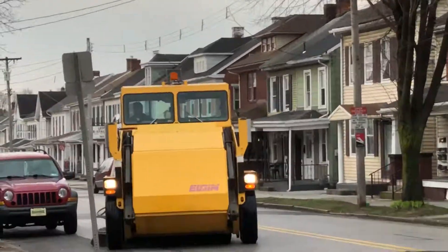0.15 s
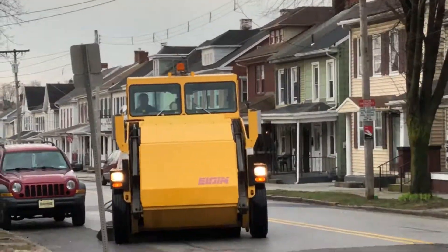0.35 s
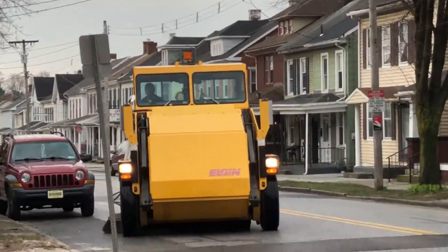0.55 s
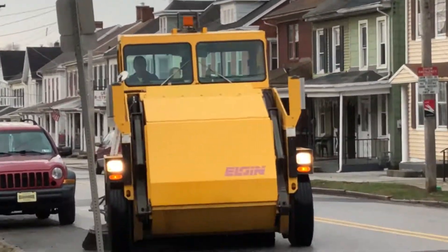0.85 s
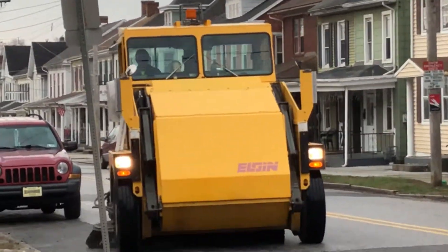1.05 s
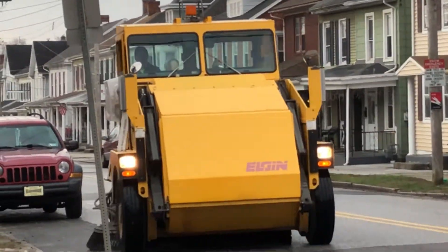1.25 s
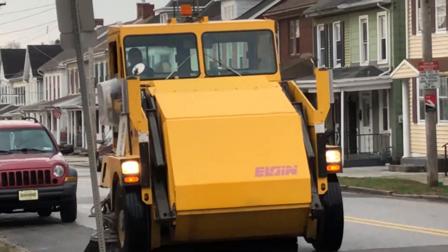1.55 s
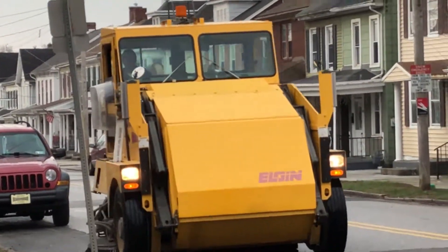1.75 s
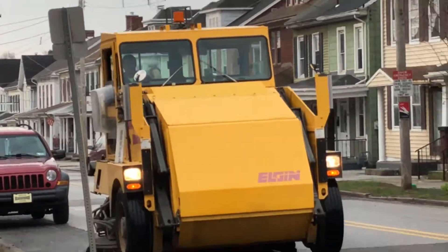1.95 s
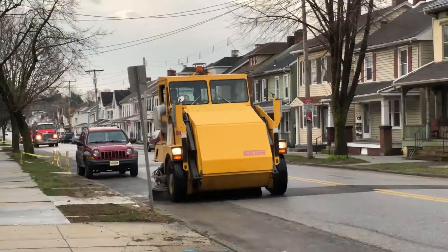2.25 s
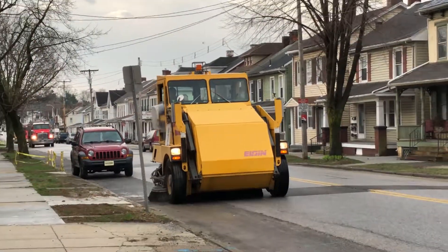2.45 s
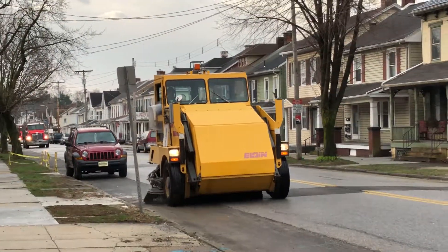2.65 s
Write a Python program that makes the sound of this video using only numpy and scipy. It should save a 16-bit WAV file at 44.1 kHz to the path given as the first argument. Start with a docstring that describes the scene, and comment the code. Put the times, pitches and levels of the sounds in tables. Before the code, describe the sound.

Street sweeper roaring steadily, low throbbing drone with bristle hiss in swells and two dull knocks

```python
"""The engine of a street sweeper, held at high revs, creeps closer along a wet residential street.
Harmonics of its uneven four-cylinder cycle drone and throb over pulsed noise: rumble and clatter.
A second, slower drive beats against it. Band-filtered noise and impulses make the bristles hiss on
the road in swells. A harmonic whine sinks and fades early; damped modes make the body knock twice."""
import sys
import numpy as np
from scipy import signal
from scipy.fft import rfft, irfft
from scipy.io import wavfile

SR = 44100
rng = np.random.default_rng(int(sys.argv[2]) if len(sys.argv) > 2 else 0)


def generate_wav(sig):
    """Save sig (samples, or channels by samples) to the path in sys.argv[1] as 16-bit PCM at SR."""
    pcm = np.round(np.clip(np.atleast_2d(sig).T, -1, 1) * 32767).astype(np.int16)
    wavfile.write(sys.argv[1], SR, pcm)


N = 123480
T = np.arange(N) / SR

# Mean firing rate of the engine: [t/s, f/Hz]
FIRING_RATE = [(0, 110.9), (.35, 110.5), (.85, 112.6), (1.7, 112.9), (2.8, 113.8)]
# Tone at the firing rate: [t/s, level/dB]
DRONE = [(0.0, -36), (0.02, -33.5), (0.65, -25), (0.79, -29.5), (1.27, -26), (1.36, -28.5), (1.84, -31.5),
         (1.89, -26.5), (2.76, -29.5), (2.8, -36)]
# Throb at the crank rate, before THROB_TRIM_DB: [t/s, level/dB]
THROB = [(0.0, -39), (0.36, -33.5), (1.01, -31.5), (1.67, -38), (2.43, -40), (2.46, -36), (2.8, -44)]
# Overtones of the firing: [t/s, level/dB at 1.5 times its rate, level/dB at twice its rate]
GROWL = [(0, -43, -46), (.55, -37.5, -47), (.9, -56, -42), (1.2, -57, -51), (1.42, -39, -38),
         (1.7, -40, -42.5), (1.92, -59, -41), (2.1, -46, -38), (2.45, -35.5, -34), (2.62, -31, -42),
         (2.8, -43, -48)]
# Weaker exhaust partials: [multiple of the cycle rate, level/dB far (start), level/dB near (end)]
EXHAUST_PARTIALS = [(9, -40, -53), (10, -58, -52), (12, -45, -45.5), (18, -55, -58), (22, -56.5, -53),
                    (24, -59, -53), (36, -65, -56)]
# Clear engine note, strongest early on: [t/s, level/dB]; and its multiple of the cycle rate
NOTE = [(0, -57), (.15, -47), (.4, -45.5), (.55, -54), (.7, -58), (2.8, -57)]
NOTE_ORDER = 20
# Clatter spectrum: [f/Hz, relative level/dB per Hz]
CLATTER_COLOUR = [(150, 2), (280, 6), (370, 2.5), (450, -1.5), (640, 0), (880, -3), (1130, 2.5), (1550, -2),
                  (2000, -.5), (2500, -3.5), (3100, -12), (5000, -18.5), (12000, -34)]
# Clatter: [t/s, level/dB]
CLATTER_LEVEL = [(0, -35), (.65, -35), (1.0, -36), (1.35, -34), (2.2, -35), (2.8, -34)]
# Slower drive: [t/s, f/Hz, level/dB of its fundamental]
DRIVE = [(0, 69.5, -52), (1.2, 71, -42), (1.45, 69.97, -44), (2.2, 70.6, -41), (2.55, 70.54, -35),
         (2.8, 71, -41)]
# Rumble: [t/s, level/dB]
RUMBLE_LEVEL = [(0, -33), (.04, -29), (.16, -34.5), (.3, -37), (.5, -39), (1.0, -38), (1.5, -37.5),
                (2.1, -38), (2.3, -35.5), (2.42, -29.5), (2.62, -34), (2.8, -33.5)]
# Rumble spectrum: [f/Hz, relative level/dB per Hz]
RUMBLE_COLOUR = [(20, -17), (35, -2), (50, -9), (70, 0), (95, -1), (140, 0.5), (195, -3.5), (260, -5.5),
                 (340, -11), (450, -21), (900, -59)]
# Hollow early hum: [t/s, level/dB]; its centre f/Hz; the rate of its wavering, f/Hz
HUM_LEVEL = [(0, -56), (.08, -32), (.2, -43), (.36, -35), (.46, -49), (.8, -60)]
HUM_HZ = 328
HUM_WIDTH_HZ = 22
# Bristle hiss before the band trims:
# [t/s, level/dB of middle band, level/dB of lower re middle, level/dB of top re middle]
BRUSH = [(0.0, -31, -7, -5), (0.12, -30.5, -9.5, -8), (0.37, -35, -5.5, 2), (0.61, -30, -5.5, -5.5),
         (1.2, -32, -5.5, 0), (1.45, -32.5, -3, 1.5), (1.68, -28, -4, 0), (1.79, -34, -1.5, 0),
         (2.0, -24, -2.5, 0), (2.05, -28, -0.5, -1), (2.29, -28, -4, 1), (2.39, -34, -3, 1),
         (2.6, -29, -6.5, -2.5), (2.7, -31, -3, 1), (2.8, -29, -5.5, -0.5)]
# Spectra of the three hiss bands: [f/Hz, relative level/dB per Hz]
HISS_LOW = [(2000, -19), (3100, -12), (3800, -5.5), (4400, -5.5), (5000, -2), (6200, -0.5), (7200, -2.5),
            (9000, -26)]
HISS_MID = [(4500, -18), (6300, -10.5), (7400, 0.5), (8600, 1), (9600, 1), (10600, -7), (12500, -32)]
HISS_TOP = [(8500, -44), (10200, -0.5), (11000, 0.5), (11900, 1.5), (13000, -2), (14200, -4), (15600, -11)]
# Band trims: [lower level/dB, middle level/dB, top level/dB]
HISS_TRIMS = (0.5, .5, 0.5)
# Whine: [t/s, f/Hz of the absent fundamental, level/dB]
WHINE = [(0, 182.5, -39.5), (.22, 181.5, -39), (.42, 177, -43.5), (.6, 174.5, -44.5), (.9, 168.5, -48),
         (1.1, 166, -65)]
# Whine harmonics: [multiple of the fundamental, level/dB re the whine level]
WHINE_PARTIALS = [(2, -7), (3, -15), (4, -6), (5, -14.5), (6, -4)]
# Knocks of the body: [onset t/s, peak level/dB]
KNOCKS = [(1.883, -24), (2.170, -15.5)]
# Modes of the body: [f/Hz, relative level/dB, 60 dB decay t/s]
BODY_MODES = [(208, -4, .035), (296, 3, 0.023), (410, -1, 0.024)]

SPEED_JITTER = 0.003  # rms fraction of the firing rate
THROB_TRIM_DB, DRIVE_OCTAVE_DB = -0.5, -2.5
EXHAUST_FLUTTER = 0.36  # rms, relative to the steady partial
RUMBLE_PULSING, CLATTER_PULSING = 0.59, 0.16  # modulation depths, 0 to 1
FLICKS_PER_S, FLICK_SPREAD_DB, FLICK_DB = 5000, 3, -6.5
KNOCK_PUSH_S = 0.0012  # time constant of the onset
TOP_HZ = 15700


def undb(db):
    """A level in decibels is 20 log10 of the amplitude ratio returned here."""
    return 10 ** (np.asarray(db) / 20)


def unit(x):
    """Division by the root mean square gives a signal of rms 1."""
    return x / np.sqrt(np.mean(x ** 2))


def curve(table, axis=1):
    """Linear interpolation in time joins the values of one table column."""
    rows = np.array(table, float)
    return np.interp(T, rows[:, 0], rows[:, axis])


def colour(x, points):
    """Spectral shaping: multiply the spectrum by a gain curve, then scale to rms 1."""
    hz, db = np.array(points, float).T
    f = np.maximum(np.fft.rfftfreq(N, 1 / SR), 1)
    gain = undb(np.interp(np.log(f), np.log(hz), db))
    # beyond the end points the gain falls by 12 dB per octave
    outside = np.maximum(np.maximum(np.log(hz[0] / f), np.log(f / hz[-1])), 0)
    return unit(irfft(rfft(x) * gain * np.exp(-2 * outside), N))


def noise():
    """White noise: independent Gaussian samples have equal expected power at all frequencies."""
    return rng.standard_normal(N)


def walk(rate):
    """Low-passed noise fluctuates smoothly at about the given rate in Hz, with rms 1."""
    f = np.fft.rfftfreq(N, 1 / SR)
    lowpass = (f > 0) / (1 + (f / rate) ** 2) ** 2
    return unit(irfft(rfft(noise()) * lowpass, N))


def partial(turns, order, flutter, rate):
    """A harmonic of a rotation; complex modulation makes its amplitude and phase waver."""
    waver = 1 + flutter * (walk(rate) + 1j * walk(rate))
    phase = 2 * np.pi * (order * turns + rng.random())
    return unit(np.real(waver * np.exp(1j * phase)))


def clatter(firings):
    """Amplitude modulation: broadband noise pulses at the firing rate."""
    gate = 1 + CLATTER_PULSING * np.cos(2 * np.pi * firings)
    return undb(curve(CLATTER_LEVEL)) * colour(gate * noise(), CLATTER_COLOUR)


def engine(firings):
    """Harmonic synthesis: uneven cylinders excite multiples of the four-firing cycle."""
    cycle = firings / 4
    drone = undb(curve(DRONE)) * partial(cycle, order=4, flutter=0.064, rate=23)
    throb = undb(curve(THROB) + THROB_TRIM_DB) * partial(cycle, order=2, flutter=0.15, rate=16)
    growl = undb(curve(GROWL)) * partial(cycle, order=6, flutter=0.14, rate=3.7)
    growl += undb(curve(GROWL, axis=2)) * partial(cycle, order=8, flutter=0.29, rate=6.5)
    upper = np.zeros(N)
    for order, far, near in EXHAUST_PARTIALS:
        level = far + (near - far) * T / T[-1]
        upper += undb(level) * partial(cycle, order, EXHAUST_FLUTTER, rate=8)
    note = undb(curve(NOTE)) * partial(cycle, NOTE_ORDER, flutter=0.13, rate=8)
    return drone + throb + growl + upper + note + clatter(firings)


def drive():
    """Beating: a slower rotation sounds a low tone and its octave against the engine."""
    turns = np.cumsum(curve(DRIVE)) / SR
    tone = partial(turns, order=1, flutter=0.25, rate=6.4)
    octave = partial(turns, order=2, flutter=0.47, rate=8)
    return undb(curve(DRIVE, axis=2)) * (tone + undb(DRIVE_OCTAVE_DB) * octave)


def hum():
    """Narrow-band resonance: random modulation broadens a fixed tone into a hollow early hum."""
    return undb(curve(HUM_LEVEL)) * partial(HUM_HZ * T, order=1, flutter=0.9, rate=HUM_WIDTH_HZ)


def rumble(firings):
    """Amplitude modulation: low exhaust noise puffs once a crank turn, every two firings."""
    puffs = (1 + RUMBLE_PULSING * np.cos(np.pi * firings)) * noise()
    return undb(curve(RUMBLE_LEVEL)) * colour(puffs, RUMBLE_COLOUR)


def bristles():
    """Shot noise: random flicks of wire on asphalt add to the smooth noise of a wet scrape."""
    strikes = rng.random(N) < FLICKS_PER_S / SR
    strength = undb(FLICK_SPREAD_DB * np.minimum(rng.exponential(size=N), 6))
    flicks = strikes * np.sign(noise()) * strength
    return noise() + undb(FLICK_DB) * unit(flicks)


def brush():
    """Band-filtered friction noise: three bands swell separately as the broom bears on the road."""
    middle = curve(BRUSH)
    levels = (middle + curve(BRUSH, axis=2), middle, middle + curve(BRUSH, axis=3))
    hiss = np.zeros(N)
    for level, trim, shape in zip(levels, HISS_TRIMS, (HISS_LOW, HISS_MID, HISS_TOP)):
        hiss += undb(level + trim) * colour(bristles(), shape)
    return hiss * undb(0.39 * walk(25))  # shared flutter, 0.39 dB rms


def whine():
    """Harmonics of a gliding fundamental: a machine whine sinks in pitch as it fades."""
    turns = np.cumsum(curve(WHINE) * (1 + 0.0025 * walk(12))) / SR
    tone = np.zeros(N)
    for order, db in WHINE_PARTIALS:
        tone += undb(db) * partial(turns, order, flutter=0.18, rate=12)
    return undb(curve(WHINE, axis=2)) * tone


def knocks():
    """Modal decay: each dull knock is a sum of quickly damped sinusoids of the body."""
    out = np.zeros(N)
    for start, db in KNOCKS:
        age = np.maximum(T - start, 0)
        ring = np.zeros(N)
        for hz, mode_db, t60 in BODY_MODES:
            decay = np.exp(-np.log(1000) * age / t60)
            ring += undb(mode_db) * np.sin(2 * np.pi * hz * age) * decay
        ring *= 1 - np.exp(-age / KNOCK_PUSH_S)
        out += undb(db) * ring / np.abs(ring).max()
    return out


def scene():
    """Superposition: all sources add straight ahead, the same in both ears."""
    rate = curve(FIRING_RATE) * (1 + SPEED_JITTER * walk(10.7))
    firings = np.cumsum(rate) / SR  # running count
    mid = engine(firings) + drive() + rumble(firings) + hum() + brush() + whine() + knocks()
    return np.array([mid, mid])


def record(dry):
    """Low-pass filtering: an elliptic filter cuts the top steeply."""
    lowpass = signal.ellip(12, 0.1, 90, TOP_HZ, fs=SR, output="sos")  # 0.1 dB ripple, 90 dB stop
    return signal.sosfilt(lowpass, dry)


dry = scene()
out = record(dry)
generate_wav(out)
```